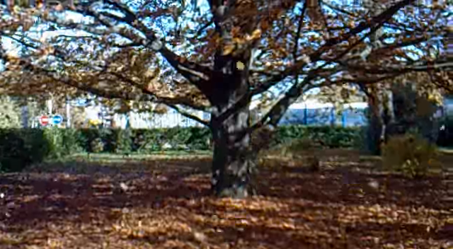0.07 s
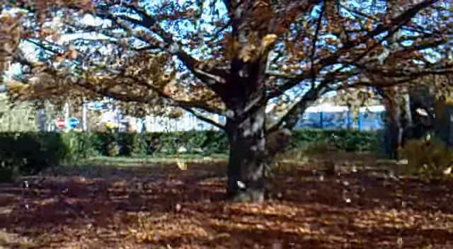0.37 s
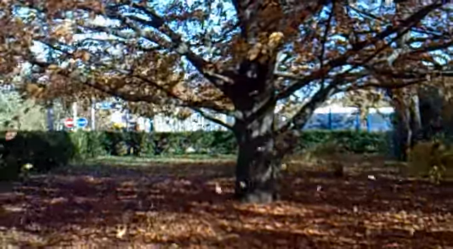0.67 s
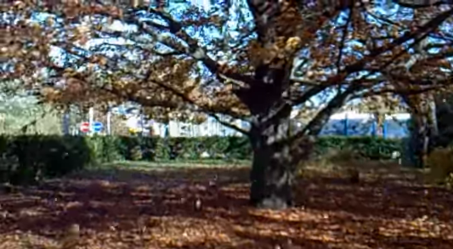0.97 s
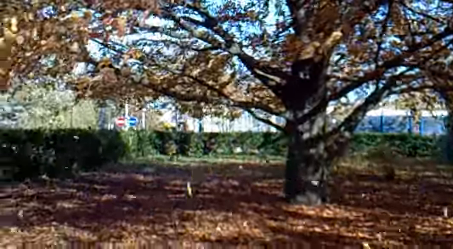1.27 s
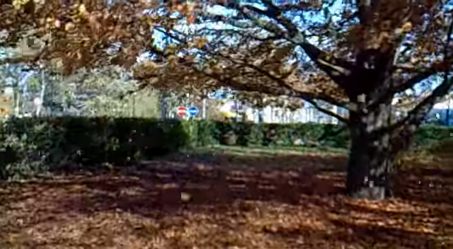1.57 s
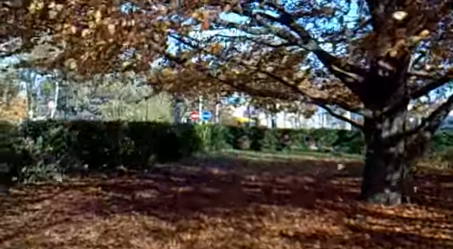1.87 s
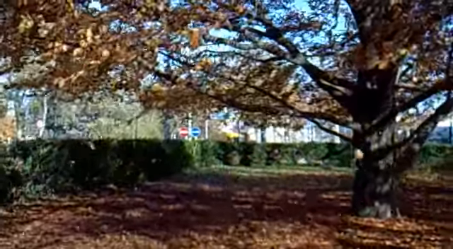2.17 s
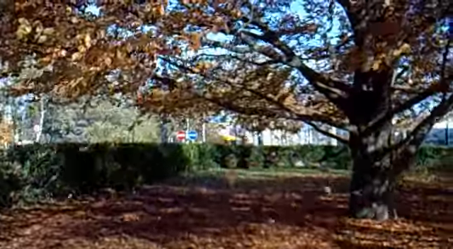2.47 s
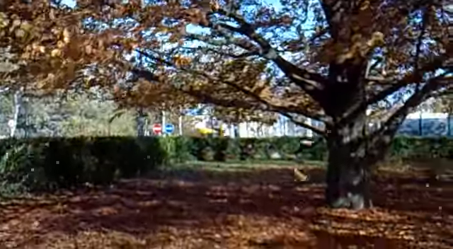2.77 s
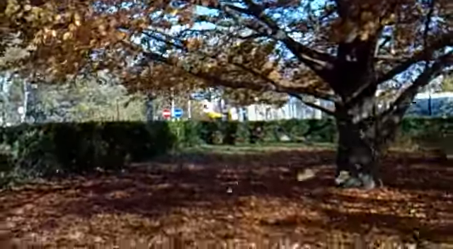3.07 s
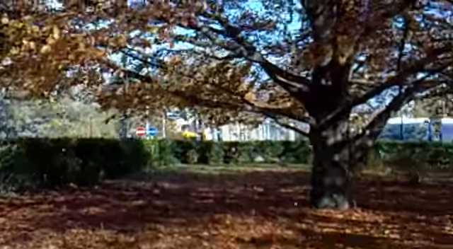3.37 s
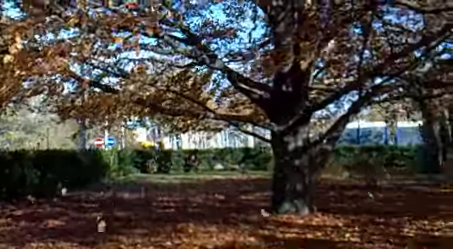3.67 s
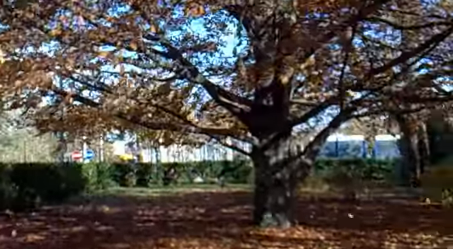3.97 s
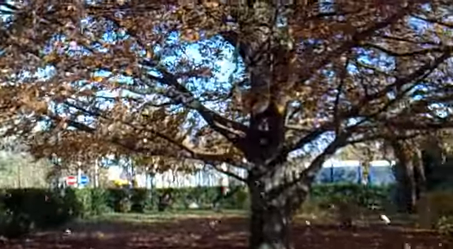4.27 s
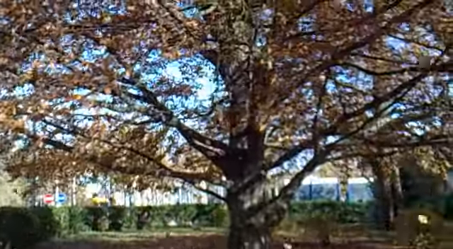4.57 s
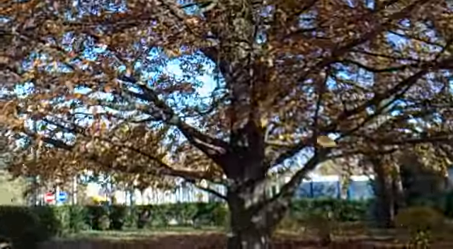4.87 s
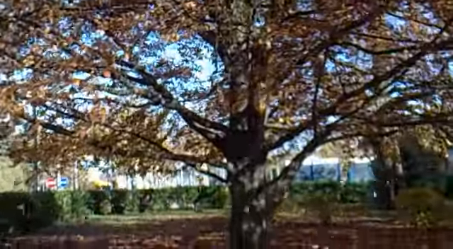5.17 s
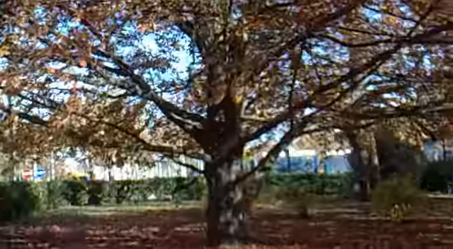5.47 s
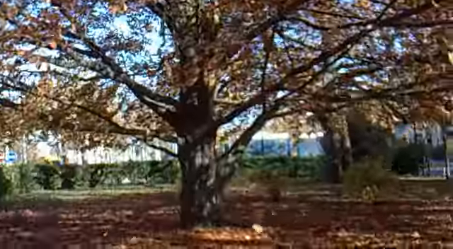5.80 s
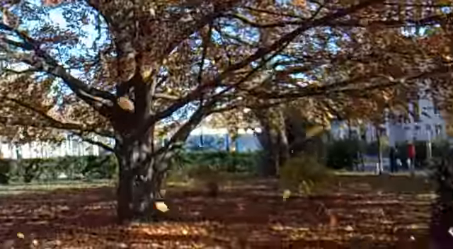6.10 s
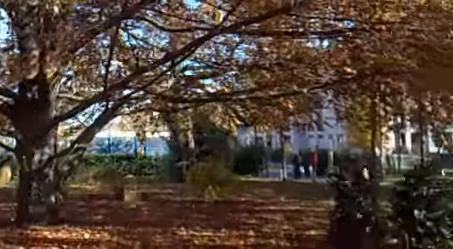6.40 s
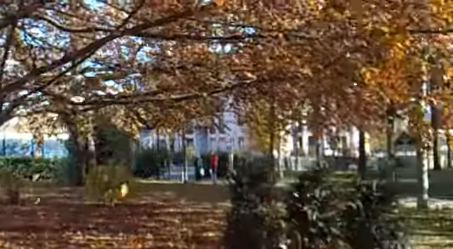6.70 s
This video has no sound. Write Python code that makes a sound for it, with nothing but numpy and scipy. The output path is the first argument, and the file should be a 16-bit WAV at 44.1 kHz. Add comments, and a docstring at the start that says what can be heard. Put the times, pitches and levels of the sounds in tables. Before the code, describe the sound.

Uneven puffs of wind buffet the microphone while dry leaves hiss and tick in a park, easing off near the end.

```python
"""Gusts in an autumn tree

A sharp click and a moment of silence, then a park. Puffs riding on a breeze buffet the microphone
and shake a tree: its dry leaves hiss and patter, and a few tick close by. Farther trees add a soft
wash, and a small bird calls twice. As the wind drops, a distant engine drones through."""
import sys
import numpy as np
from scipy import signal
from scipy.fft import rfft, irfft, next_fast_len
from scipy.io import wavfile
from scipy.ndimage import uniform_filter1d, map_coordinates

SR = 44100
rng = np.random.default_rng(int(sys.argv[2]) if len(sys.argv) > 2 else 0)


def log_audio(samples):
    """Write samples as a 16-bit WAV file to the path given in sys.argv[1]."""
    # one column per channel
    frames = np.atleast_2d(samples).T
    # limit to full scale, then quantise
    limited = np.clip(frames, -1, 1)
    pcm = np.round(limited * 32767).astype(np.int16)
    wavfile.write(sys.argv[1], SR, pcm)


N = 306054
GUST_ATTACK_S, GUST_RELEASE_S = 0.049, 0.067


def amp(db):
    """Decibels to gain."""
    return 10 ** (np.asarray(db) / 20)


def unit(x):
    """x at rms 1."""
    return x / np.sqrt(np.mean(x ** 2) + 1e-20)


def curve(rows):
    """Straight lines through (seconds, value) points, one value per sample."""
    times, values = np.transpose(rows)
    return np.interp(np.arange(N) / SR, times, values)


def wobble(rate):
    """A smooth random curve, rate knots a second."""
    return map_coordinates(rng.standard_normal(N), [np.arange(N) * rate / SR], mode="mirror")


def filtered(x, response):
    """x filtered by a gain that is a function of Hz."""
    size = next_fast_len(len(x) + 8192)
    return irfft(rfft(x, size) * response(np.fft.rfftfreq(size, 1 / SR)), size)[:len(x)]


def coloured(x, spectrum):
    """x shaped by (Hz, dB) points on a log axis, at rms 1."""
    points_hz, db = np.transpose(spectrum)
    return unit(filtered(x, lambda hz: amp(np.interp(np.log(hz + 1), np.log(points_hz), db))))


def add(track, start_s, sound):
    """Mix a sound into the track from start_s."""
    part = track[max(round(start_s * SR), 0):][:len(sound)]
    part += sound[:len(part)]


def swell_power(rows, attack_s, release_s):
    """Summed power of (start, length, dB) events that each rise, hold and die away."""
    power, t = np.zeros(N), np.arange(SR) / SR
    for start, length, db in rows:
        rise = np.minimum(t / attack_s, 1)
        fall = np.exp(-np.maximum(t - length, 0) / release_s)
        add(power, start, (amp(db) * rise * fall) ** 2)
    return power


# The town beyond the park. Each row: frequency in Hz, relative level in dB.
TOWN_SPECTRUM = [(20, -21), (55, 1), (110, 11), (220, -11), (320, -10), (600, -6), (1500, -29), (5000, -63)]
# One engine, far off. Each row: frequency of a tone in Hz, rms level in dB.
ENGINE_TONES = [(59, -53), (194, -59.5)]

def traffic(town_db=-57):
    """A far engine drones unsteadily over the rumble of the town."""
    drifting_time = np.cumsum(1 + .008 * wobble(3)) / SR
    drone = np.zeros(N)
    for hz, db in ENGINE_TONES:
        drone += np.sqrt(2) * amp(db + 0.76 * wobble(2.3)) * np.sin(2 * np.pi * hz * drifting_time)
    return drone + amp(town_db) * coloured(rng.standard_normal(N), TOWN_SPECTRUM)


# A hollow band and a thin hiss in the distance. Each row: frequency in Hz, relative level in dB.
HOLLOW_SPECTRUM = [(900, -43), (1400, -20), (1600, 0), (1780, 1), (2000, -9), (3000, -63)]
AIR_SPECTRUM = [(1000, -7), (4000, 18), (7000, 0), (9000, 3), (12500, 5), (15700, -7)]
# Swells of the hollow band. Each row: start in seconds, length in seconds, level in dB.
RUSH_SWELLS = [(4.8, 0.072, -56), (5.06, 0.037, -50), (5.6, 0.18, -64)]

def distant_rush(air_db=-61.5, hollow_db=-65):
    """A hollow rushing far off, and a thin hiss that stays between the gusts."""
    power = amp(hollow_db) ** 2 + swell_power(RUSH_SWELLS, GUST_ATTACK_S, GUST_RELEASE_S)
    hollow = np.sqrt(power) * coloured(rng.standard_normal(N), HOLLOW_SPECTRUM)
    return hollow + amp(air_db) * coloured(rng.standard_normal(N), AIR_SPECTRUM)


# Trees farther from the microphone. Each row: frequency in Hz, relative level in dB.
FAR_TREE_SPECTRUM = [(200, -40), (480, -5.5), (800, -7.5), (1050, -6.5), (1300, -6.5), (1750, -4.5),
                     (2250, -7), (3200, -10.5), (6000, -7.5), (12000, -22.5)]

def far_trees(rustle_db, mean_db=-53.0, response=0.69, drift_db=4.64):
    """Farther trees give a softer, duller wash, whose swells blur together."""
    blurred_db = uniform_filter1d(rustle_db - rustle_db.mean(), size=SR // 6)
    wash_db = mean_db + response * blurred_db + drift_db * wobble(4.5)
    return amp(wash_db) * coloured(rng.standard_normal(N), FAR_TREE_SPECTRUM)


# A small bird, faint behind the leaves.
# Each row: start in seconds, length in seconds, first and last pitch in Hz, peak level in dB.
BIRD_NOTES = [(3.99, .085, 7800, 6950, -51.5), (4.155, .14, 7850, 6250, -52.5)]

def bird():
    """Thin whistles that slide down and waver."""
    out = np.zeros(N)
    for start, length, first_hz, last_hz, db in BIRD_NOTES:
        progress = np.linspace(0, 1, round(length * SR))
        waver = 1 + .022 * wobble(400)[:len(progress)]
        hz = first_hz * (last_hz / first_hz) ** progress * waver
        arch = np.sqrt(4 * progress * (1 - progress))
        add(out, start, amp(db) * arch * np.sin(2 * np.pi * np.cumsum(hz) / SR))
    return out


def click(start_s=.070, drive_db=-9.0, t60=0.027, corner_hz=7000):
    """One sharp, dry click: a flat burst that stops dead, through a low-pass that lifts its body."""
    out, t = np.zeros(N), np.arange(round(.0036 * SR)) / SR
    random_phases = np.exp(2j * np.pi * rng.random(len(t)))
    burst = unit(irfft(random_phases, len(t)))
    add(out, start_s, amp(drive_db - 60 * t / t60) * burst)
    pole = np.exp(-2 * np.pi * corner_hz / SR)
    return signal.lfilter([1], [1, -pole], out)


# Gusts up in the near tree. Each row: start in seconds, length in seconds, level in dB.
CROWN_GUSTS = [(1.49, 0.23, -48.5), (2.05, 0.099, -44), (3.24, 0.11, -43), (3.38, 0.14, -44),
               (3.52, .13, -38.5), (3.65, 0.062, -39.5), (3.84, .19, -52), (4.48, .06, -52.5),
               (4.82, 0.11, -47.5), (5.05, 1.1, -54.5), (6.2, 0.16, -51), (6.7, .2, -53.5)]

def rustle_level(wind_db, loose_db=-49.5, firm_db=-43, stiff_wind_db=-15, settle_s=0.019):
    """Rustle in dB: the leaves lag behind the wind, and catch gusts of their own."""
    excess_db = wind_db - stiff_wind_db
    loose = amp(loose_db + 0.12 * excess_db)  # stir in any air
    firm = amp(firm_db + 0.85 * excess_db)  # need a puff
    pole = np.exp(-1 / (settle_s * SR))
    shaken = signal.lfilter([1 - pole], [1, -pole], np.hypot(loose, firm))
    return 10 * np.log10(shaken ** 2 + swell_power(CROWN_GUSTS, GUST_ATTACK_S, GUST_RELEASE_S))


# Dry foliage of the near tree. Each row: frequency in Hz, relative level in dB.
LEAF_SPECTRUM = [(500, -21), (1200, -6.5), (1800, -7), (2400, -6.5), (3300, -2.5), (4100, -1.5), (5000, -6),
                 (6400, -5.5), (8200, -15), (10500, -19), (13000, -25.5), (15700, -25)]

def leaves(rustle_db, contacts_per_s=1400, spread_db=7.0, contact_t60=0.0035, patter_db=-5, hiss_db=-2):
    """Countless leaves merge into a hiss; the nearer ones patter, more densely in a gust."""
    density = contacts_per_s * amp(rustle_db - rustle_db.mean())
    touches = rng.random(N) < density / SR
    contacts = touches * amp(spread_db * np.minimum(rng.standard_normal(N), 3))
    t = np.arange(SR // 50) / SR
    scrape = amp(-60 * t / contact_t60)  # each contact dies within milliseconds
    energy = np.abs(signal.fftconvolve(contacts ** 2, scrape ** 2)[:N]) / density
    patter = coloured(np.sqrt(energy) * rng.standard_normal(N), LEAF_SPECTRUM)
    hiss = coloured(rng.standard_normal(N), LEAF_SPECTRUM)
    return amp(rustle_db + 0.02 * wobble(24)) * (amp(patter_db) * patter + amp(hiss_db) * hiss)


# Single dry leaves, close to the microphone.
# Each row: start in seconds, relative level in dB, pitch in Hz, half width in octaves.
LEAF_STRIKES = [(0.681, -29.5, 5360, 0.13), (2.452, -32.5, 4970, 0.49), (2.650, -30.5, 4200, .47),
                (3.708, -25, 3760, 0.42), (3.866, -27.5, 4460, .38), (3.962, -38.5, 9750, 0.57),
                (4.058, -39, 8500, .3), (4.535, -31.5, 6540, 0.23), (4.923, -35.5, 2420, 0.081),
                (5.280, -36, 4370, .04), (5.474, -35.5, 5900, 0.31), (6.278, -39.5, 7620, 0.13)]

def leaf_ticks(gain_db=-3.0, t60=0.035, attack_s=0.00028):
    """A stiff leaf hits and crackles briefly around its own pitch."""
    out, t = np.zeros(N), np.arange(SR // 10) / SR
    for start, db, pitch_hz, octaves in LEAF_STRIKES:
        noise = rng.standard_normal(len(t))
        crackle = filtered(noise, lambda hz: 1 / (1 + (np.log2((hz + 1) / pitch_hz) / octaves) ** 2))
        envelope = amp(db + gain_db - 60 * t / t60) * (1 - np.exp(-t / attack_s))
        add(out, start, unit(crackle) * envelope)
    return out


# The breeze at the microphone between puffs. Each row: time in seconds, level in dB.
BREEZE_LEVELS = [(0.25, -24), (0.63, -24.5), (0.74, -41), (1.02, -32), (1.29, -46), (1.34, -60.5),
                 (1.45, -25), (1.82, -35), (2.11, -23), (2.4, -29.5), (2.59, -21), (3.22, -26), (3.8, -27),
                 (4.09, -30.5), (4.38, -37.5), (4.54, -31), (5.1, -37.5), (5.41, -48.5), (5.81, -47.5),
                 (6.5, -60), (6.94, -49.5)]
# Puffs that hit the microphone. Each row: start in seconds, length in seconds, level in dB.
MIC_PUFFS = [(0.258, 0.026, -19), (0.325, 0.11, -19.5), (0.446, 0.055, -15), (0.543, 0.028, -12.5),
             (0.661, 0.03, -18), (0.765, 0.025, -13), (0.824, 0.13, -28.5), (1.066, 0.052, -31),
             (1.491, 0.061, -17), (1.58, 0.072, -19.5), (1.716, 0.056, -24.5), (1.837, 0.06, -14.5),
             (2.108, 0.015, -11.5), (2.156, 0.13, -19.5), (2.466, 0.18, -17), (2.545, 0.022, -11),
             (2.753, 0.054, -25.5), (2.843, 0.048, -23), (2.937, 0.12, -26.5), (3.075, 0.072, -24),
             (3.291, 0.058, -23.5), (3.515, 0.079, -25), (3.665, 0.1, -28), (3.832, 0.02, -13),
             (3.898, 0.033, -15.5), (4.011, 0.013, -15), (4.153, 0.18, -28), (4.426, 0.088, -24),
             (4.642, 0.047, -23), (4.725, 0.077, -30.5), (4.809, 0.048, -19), (4.873, 0.011, -21),
             (5.004, 0.077, -27.5), (5.185, 0.19, -39.5), (5.476, 0.23, -43.5), (6.079, 0.046, -40.5),
             (6.209, 0.12, -49)]

def wind_level():
    """Strength of the wind at the microphone in dB: puffs on top of the breeze."""
    breeze = amp(curve(BREEZE_LEVELS))
    return 10 * np.log10(breeze ** 2 + swell_power(MIC_PUFFS, attack_s=0.011, release_s=0.021))


# Flow past the microphone. Each row: time in seconds, briskness in dB (higher is faster and brighter).
FLOW_BRISKNESS = [(.27, -7.5), (.4, -14.5), (.57, -9.5), (.79, -8), (.88, -13), (1.07, -9.5), (1.27, -24),
                  (1.4, -8), (1.68, -7), (1.99, -13), (2.42, -6.5), (3.1, -5.5), (3.42, -13.5),
                  (3.79, -10.5), (3.91, -18), (4.04, -13.5), (4.2, -19.5), (4.84, -14), (5.3, -21.5),
                  (6.94, -25.5)]
# Eddies at the microphone port. Each row: frequency in Hz at a speed of 1, relative level in dB.
EDDY_SPECTRUM = [(10, -15), (50, 0), (110, -1.5), (200, -6), (320, -14), (500, -23.5), (800, -40.5),
                 (1300, -58.5), (2500, -90), (5000, -120)]

def buffet(wind_db, quickening=.6, port_hz=32):
    """Eddies are carried past the microphone port: the faster they go, the higher they beat."""
    flow_db = np.clip(.45 * (curve(FLOW_BRISKNESS) + 12), -7, 6)
    # the flow sputters: quick surges, tens a second, with lulls between them
    surge_db = 5.2 * np.tanh(.65 * wobble(120) + .25 * wobble(45))
    speed = amp(flow_db + quickening * surge_db)
    eddies = coloured(rng.standard_normal(2 * N), EDDY_SPECTRUM)
    passing = map_coordinates(eddies, [np.cumsum(speed)], order=1, mode="mirror")
    pressure = filtered(passing * amp(surge_db), lambda hz: hz ** 2 / (hz ** 2 + port_hz ** 2))
    # over a twentieth of a second the wind level alone sets the strength
    local_rms = np.sqrt(np.abs(uniform_filter1d(pressure ** 2, size=SR // 20)) + 1e-9)
    return amp(wind_db) * pressure / local_rms


# The hardest eddies, right on the microphone.
# Each row: time in seconds, relative level in dB, pitch in Hz.
HARD_EDDIES = [(0.28, -11, 280), (.427, -11, 403), (.481, -12.5, 330), (.557, -8, 520), (.780, -8, 373),
               (.986, -21, 380), (1.496, -19, 393), (1.519, -14.5, 300), (1.600, -15, 354),
               (1.712, -16, 377), (1.845, -14, 424), (2.124, -4, 330), (2.21, -7.5, 398), (2.429, -19, 493),
               (2.468, -16, 396), (2.496, -6, 410), (2.564, -1, 570), (2.571, 1.5, 420), (2.581, -6, 228),
               (2.843, -12, 490), (2.876, -9, 352), (2.937, -16.5, 424), (2.959, -17, 454),
               (3.092, -7.5, 330), (3.118, -9.5, 418), (4.042, -10, 274), (4.889, -14.5, 262)]

def eddy_slaps(gain_db=-1.0):
    """A hard eddy is one quick, pointed swing of suction and pressure."""
    out, t = np.zeros(N), np.arange(-SR // 50, SR // 50) / SR
    for centre_s, db, hz in HARD_EDDIES:
        random_phase = np.exp(2j * np.pi * rng.random())
        swing = np.real(random_phase / (1 - 2j * np.pi * hz * t / 3) ** 4)  # spectrum peaks at hz
        add(out, centre_s + t[0], amp(db + gain_db) * swing)
    return out


def scene(park_start_s=.235, fade_s=0.014):
    """One wind drives the buffeting and the trees; after the click, the park fades in quickly."""
    fade_in = np.clip((np.arange(N) / SR - park_start_s) / fade_s, 0, 1)
    wind_db = wind_level()
    rustle_db = rustle_level(wind_db)
    wind = buffet(wind_db) + eddy_slaps()
    trees = leaves(rustle_db) + far_trees(rustle_db)
    park = wind + trees + distant_rush() + leaf_ticks() + bird() + traffic()
    return (click() + fade_in * park)[None]


def record(dry):
    """One microphone: the hardest eddies overload it and crack, and the highest treble is cut off."""
    clipped = np.clip(dry[0], -.72, .72)
    band_limit = signal.cheby2(14, 80, 16800, fs=SR, output="sos")
    return signal.sosfilt(band_limit, clipped)[None]


dry = scene()
out = record(dry)
log_audio(out)
```